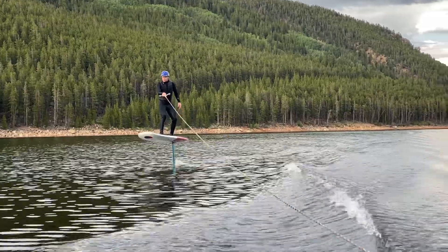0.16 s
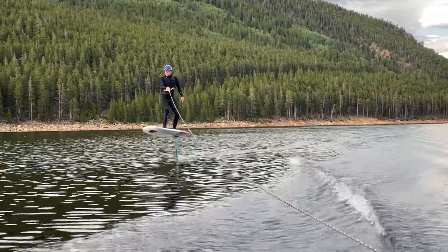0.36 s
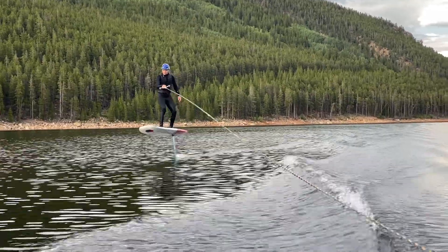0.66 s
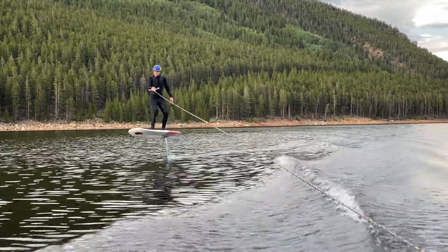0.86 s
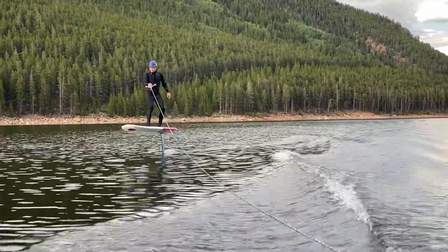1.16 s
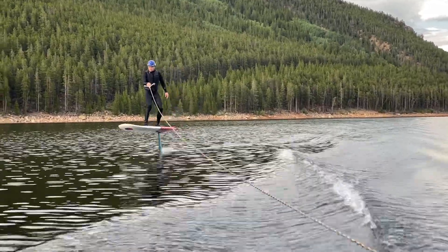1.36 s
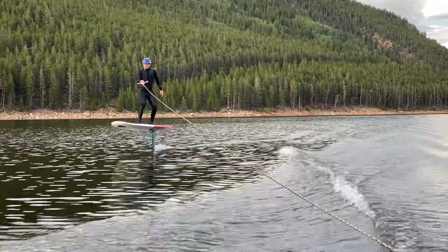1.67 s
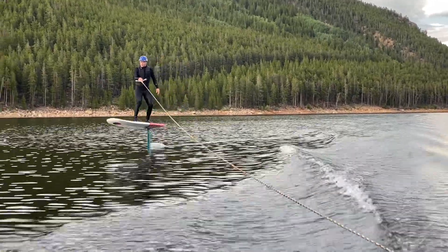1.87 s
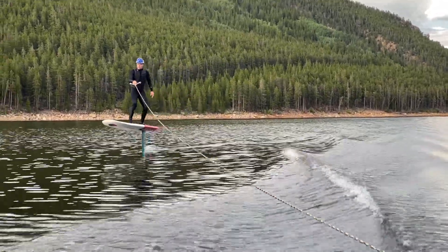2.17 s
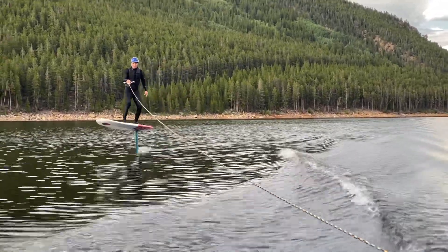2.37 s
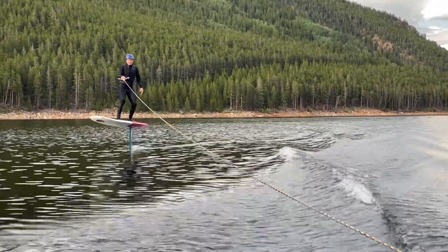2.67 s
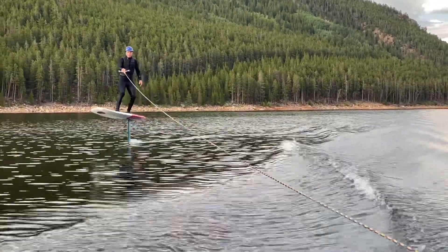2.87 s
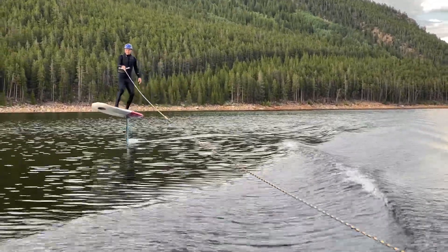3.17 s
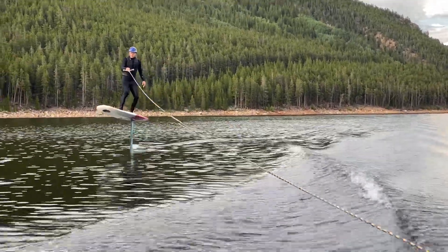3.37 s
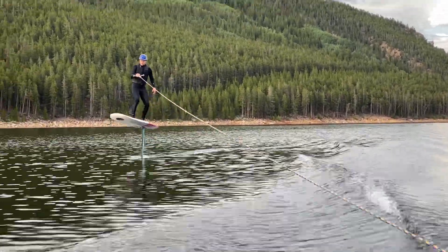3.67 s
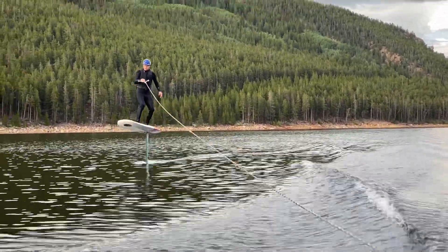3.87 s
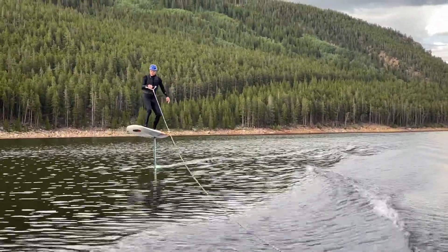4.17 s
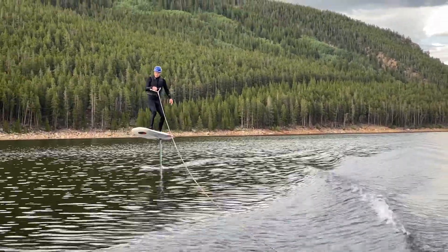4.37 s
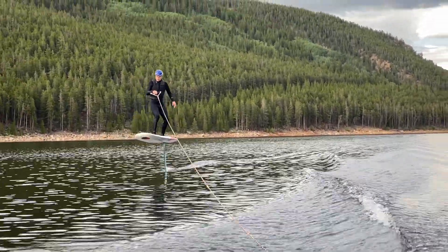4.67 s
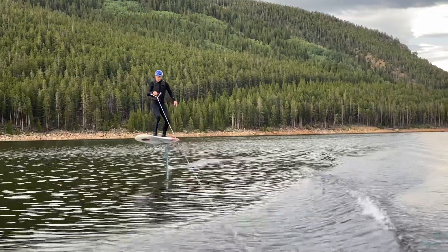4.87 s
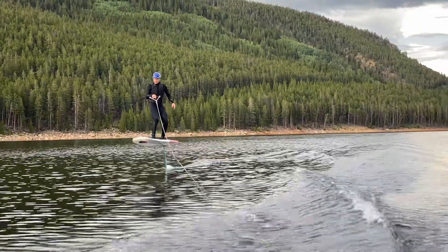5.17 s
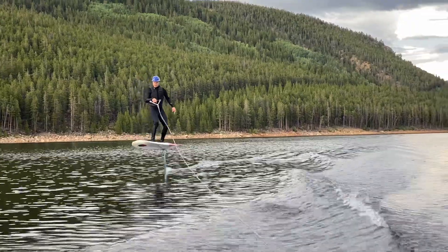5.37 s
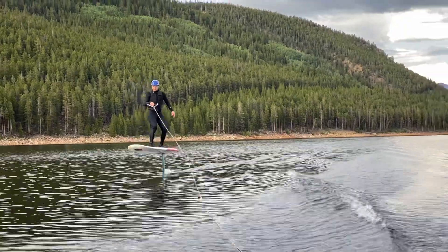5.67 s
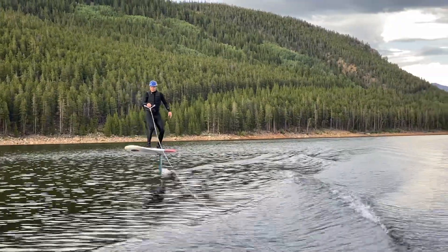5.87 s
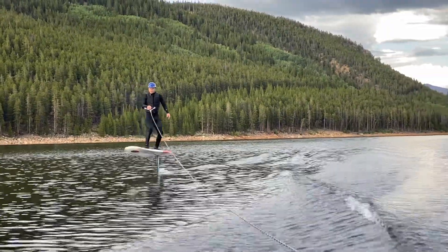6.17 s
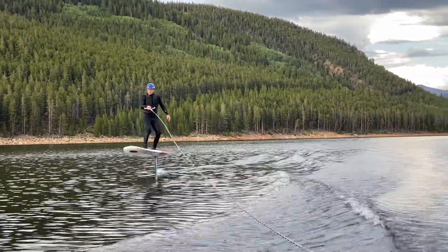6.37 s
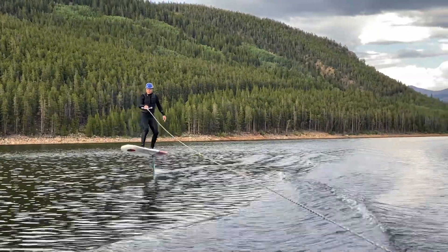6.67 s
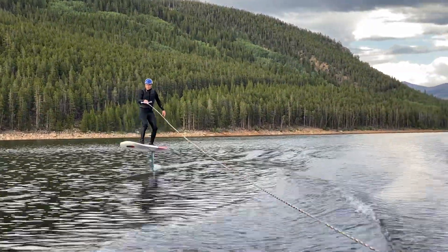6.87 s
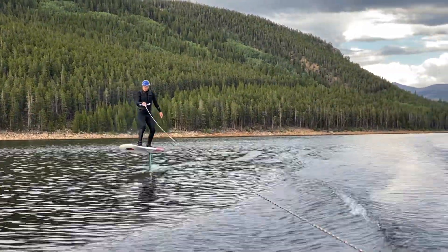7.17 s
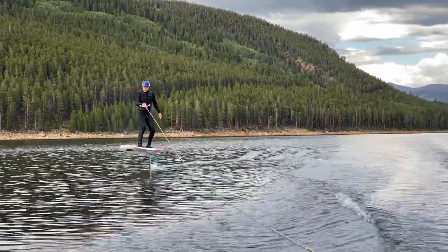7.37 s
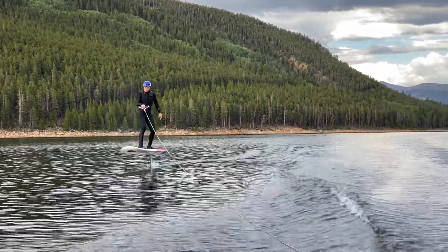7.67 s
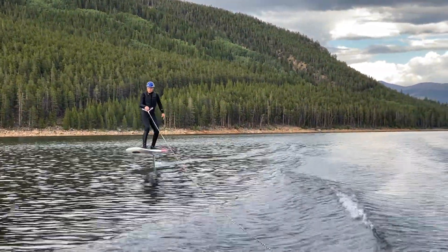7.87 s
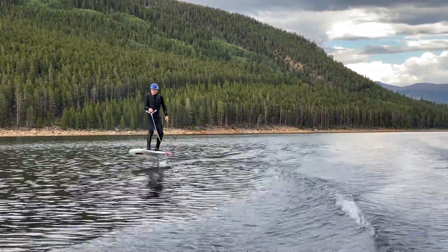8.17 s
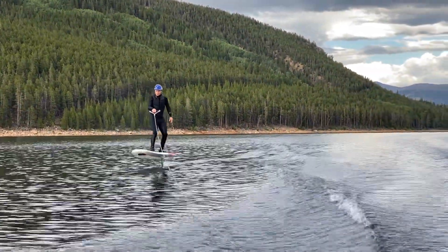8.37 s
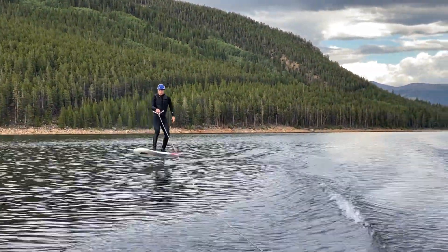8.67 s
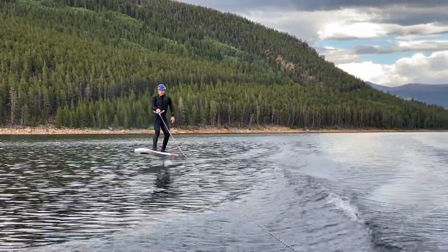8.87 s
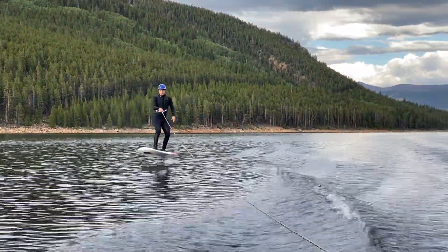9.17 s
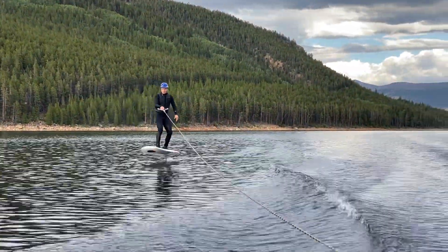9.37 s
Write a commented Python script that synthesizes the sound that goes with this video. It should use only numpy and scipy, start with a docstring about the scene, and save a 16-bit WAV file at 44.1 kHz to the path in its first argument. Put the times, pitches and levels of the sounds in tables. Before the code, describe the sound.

On board a tow boat, a constant low engine buzz and rough roar run over hissing spray, with irregular wind thumps throughout.

```python
"""On board a tow boat on a lake, the engine holding a nearly steady speed: a buzz of tones at multiples of the
shaft speed sits over a roar, filtered noise that throbs with the crank. The hiss of wake spray and engine
clatter is flickering treble noise. Head wind on a handheld microphone pair adds gusts of low noise, and each
pop is a short swing of pressure."""
import sys
import numpy as np
from scipy import signal
from scipy.fft import rfft, irfft, next_fast_len
from scipy.io import wavfile
from scipy.ndimage import uniform_filter1d, map_coordinates

SR = 44100
rng = np.random.default_rng(int(sys.argv[2]) if len(sys.argv) > 2 else 0)


def master(y):
    """Save y as 16-bit WAV."""
    cut = np.clip(np.atleast_2d(y).T, -1, 1)
    pcm = np.round(cut * 32767)  # scale
    wavfile.write(sys.argv[1], SR, pcm.astype(np.int16))


N = 420273

# stereo width of the noise, nearly mono in some bands and wide in others:
# freq_hz [Hz], side_db [dB, side noise against mid noise]
STEREO_WIDTH = [(300, -11), (560, -11), (680, -2.5), (1000, -5.5), (1300, -8), (1800, -19), (2150, -46),
                (2450, -35), (3100, -6.5), (3700, -27), (4400, -51), (6200, -46), (6500, -64), (7700, -63),
                (7950, -5), (10250, -16), (10450, -48), (11650, -50), (11900, -6), (14300, -16),
                (15100, -40)]


def amp(db):
    """Gain of a level in dB."""
    return 10 ** (np.asarray(db) / 20)


def unit(x):
    """Scale x to rms 1."""
    return x / np.sqrt(np.mean(x ** 2) + 1e-20)


def along(points, hz):
    """Read a (freq_hz, value) curve at hz, straight lines on a log frequency axis."""
    freq_hz, value = np.transpose(points)
    return np.interp(np.log(hz + 1), np.log(freq_hz + 1), value)


def resonance(hz, centre_hz, width_hz):
    """Power response of one ringing part, 1 at its centre."""
    return 1 / (1 + (2 * (hz - centre_hz) / width_hz) ** 2)


def wobble(rate):
    """A smooth random curve through normal random knots, rate knots a second."""
    knots = rng.standard_normal(int(N * rate / SR) + 4)
    return map_coordinates(knots, [np.arange(N) * rate / SR])


def filtered(x, response):
    """Multiply the spectrum of x by a response of frequency, real or complex."""
    size = next_fast_len(N + SR // 2)
    hz = np.fft.rfftfreq(size, 1 / SR)
    return irfft(rfft(x, size) * response(hz), size)[..., :N]


def rush(gain, width, envelope, patchy_db):
    """Stereo noise of rms 1: random patches of level, then a fast envelope, then colour and width."""
    spectrum = signal.stft(rng.standard_normal((2, N)), nperseg=512)[2]
    # smoothing over frequency, then time, turns single random cells into patches
    patches = rng.standard_normal(spectrum.shape[1:])
    patches = uniform_filter1d(patches, size=10, axis=0)
    patches = unit(uniform_filter1d(patches, size=3, axis=1))
    noise = signal.istft(spectrum * amp(patchy_db * patches), nperseg=512)[1][:, :N]

    def colour_and_width(hz):
        turn = np.arctan(amp(along(width, hz)))  # splits the power between mid and side
        return gain(hz) * np.array([np.cos(turn), np.sin(turn)])

    mid, side = filtered(envelope * noise, colour_and_width)
    return unit(np.array([mid + side, mid - side]))


def wind(steady_rumble_db=-29, steady_flutter_db=-31):
    """A steady stream over the ports with puffs on top, each band lumpy from its own fast envelope."""
    # puffs: centre_s [s], rumble_db [dB], flutter_db [dB], length_s [s]
    gusts = [(0.013, -18, -32, 0.051), (0.92, -23.3, -24, 0.13), (1.21, -22, -27, 0.05),
             (1.83, -24, -23, 0.049), (2.182, -20, -21, 0.095), (2.344, -20.7, -25.4, 0.07),
             (2.92, -22, -25, 0.14), (3.523, -27, -25, 0.05), (3.883, -21, -23, 0.13),
             (4.17, -22, -28, 0.11), (4.365, -19, -28, 0.099), (4.94, -18, -22, 0.078),
             (5.078, -20, -27, 0.055), (5.416, -21, -31, 0.18), (5.65, -21.2, -31, 0.083),
             (5.78, -20, -28, 0.046), (5.953, -23, -27, 0.074), (6.44, -19, -28, 0.056),
             (6.533, -20, -28, 0.05), (6.788, -26, -23.0, 0.12), (7.135, -20, -19.5, 0.044),
             (7.218, -18, -21.5, 0.04), (7.82, -30, -23, 0.07), (8.028, -20, -20.5, 0.067),
             (8.348, -18.5, -23.5, 0.11), (8.71, -19, -25, 0.088), (8.85, -20, -26, 0.03),
             (8.94, -18.5, -18, 0.04), (9.35, -22, -30, 0.03), (9.43, -25, -23, 0.05),
             (9.52, -20, -16.5, 0.03)]
    # colour of the deep rumble: freq_hz [Hz], relative_db [dB per Hz]
    rumble_colour = [(15, -46), (25, -18), (42, -9), (60, 3.5), (90, 1.5), (140, -3.5), (220, -12),
                     (400, -54), (900, -120)]
    # colour of the higher flutter: freq_hz [Hz], relative_db [dB per Hz]
    flutter_colour = [(80, -46), (140, -0.5), (240, 2.5), (330, -2.5), (500, -15.5), (800, -15),
                      (1500, -38), (3000, -120)]
    t = np.arange(N) / SR
    rumble_power = np.full(N, amp(2 * steady_rumble_db))
    flutter_power = np.full(N, amp(2 * steady_flutter_db))
    for centre_s, rumble_db, flutter_db, length_s in gusts:
        puff = np.exp(-2.5 * ((t - centre_s) / length_s) ** 2)
        rumble_power += amp(2 * rumble_db) * puff
        flutter_power += amp(2 * flutter_db) * puff
    rumble = rush(lambda hz: amp(along(rumble_colour, hz)), [(60, -8.0)], amp(1.3 * wobble(20)), patchy_db=-0.5)
    flutter = rush(lambda hz: amp(along(flutter_colour, hz)), [(200, -9.0)], amp(1.6 * wobble(35)), patchy_db=0.5)
    # both bands lean to the right port, the flutter more
    rumble *= np.sqrt(rumble_power) * amp([[-.4], [.4]])
    flutter *= np.sqrt(flutter_power) * amp([[-1.1], [1.1]])
    return rumble + flutter


def pops():
    """An eddy strikes the ports: one push and pull of pressure, a little different at each port."""
    # pops: centre_s [s], level_db [dB, top of the bell envelope before the spread between ports]
    strikes = [(1.229, -10.9), (2.158, -15), (2.938, -7), (3.888, -8), (4.366, -16), (4.886, -6),
               (4.917, -11), (5.08, -12), (6.429, -14), (6.517, -3), (6.588, -3), (6.731, -19),
               (7.126, -10), (7.831, -11), (8.28, -7), (8.345, -12), (8.369, -10), (8.914, -4), (8.955, -8),
               (9.435, -7), (9.519, -15)]
    pitch_hz, pitch_scatter = 260, 0.065  # middle pitch, and its random spread as a share
    out = np.zeros((2, N + SR))
    t = np.arange(-512, 512) / SR
    port = np.array([[1], [-1]])  # left, right
    draws = rng.standard_normal((len(strikes), 4))
    for (centre_s, level_db), (turn, pan, skew, size) in zip(strikes, draws):
        hz = pitch_hz * np.exp(pitch_scatter * size)
        bell = np.exp(-(3.3 * hz * t) ** 2)
        swing = bell * np.sin(2 * np.pi * hz * t + .4 * turn + 0.27 * skew * port)
        first = round(centre_s * SR)
        out[:, first:first + len(t)] += amp(level_db + 1.1 * pan * port) * swing
    half = len(t) // 2  # puts the middle of each swing on its time
    return out[:, half:half + N]


def crank():
    """Crank angle in radians, the running sum of the shaft speed."""
    # shaft speed: time_s [s], speed_hz [turns per second]
    shaft_speed = [(0.0, 70.88), (2.0, 70.61), (2.8, 70.75), (4.0, 70.57), (5.2, 70.63), (6.2, 70.87),
                   (6.8, 70.87), (7.2, 70.75), (8.0, 70.7), (9.6, 70.75)]
    time_s, speed_hz = np.transpose(shaft_speed)
    return 2 * np.pi * np.cumsum(np.interp(np.arange(N) / SR, time_s, speed_hz)) / SR


def hiss(angle):
    """Wake spray and engine clatter: flickering treble noise that also pulses once and twice a turn."""
    # colour of the treble: freq_hz [Hz], relative_db [dB per Hz]
    treble_colour = [(1710, -10.5), (2900, -4.5), (3180, -13.5), (3390, -8.5), (4150, -1), (4520, -5),
                     (5360, -4.5), (6410, -9), (7140, -14), (8530, -8), (10500, -8.5), (12100, -13.5),
                     (13400, -12), (14400, -21), (16000, -20.5)]
    # metal parts ringing in the clatter: centre_hz [Hz], width_hz [Hz], boost_db [dB above the hiss]
    rattles = [(4270, 74, 3), (5250, 470, 1.5), (5800, 150, 1), (6300, 220, 4)]
    level_db = -35  # middle level

    def gain(hz):
        ringing_db = sum(boost_db * resonance(hz, centre_hz, width_hz) for centre_hz, width_hz, boost_db in rattles)
        return amp(along(treble_colour, hz) + ringing_db)

    turn_db = 1.0 * np.cos(angle + 2.2) + .6 * np.cos(2 * angle)
    pulse = amp(turn_db + 0.47 * wobble(45))
    level = amp(level_db + 0.21 * wobble(20))
    return level * rush(gain, STEREO_WIDTH, pulse, patchy_db=0.9)


def roar(angle):
    """Exhaust and intake noise, pushed by the firings, rings in the exhaust and engine cover."""
    # resonances of exhaust and cover: centre_hz [Hz], width_hz [Hz], peak_db [dB], all before sharpening
    cover_modes = [(568, 134, -0.5), (788, 226, 0), (990, 74, -3), (1216, 140, -2), (1415, 185, -2),
                   (1589, 114, -1.5), (1860, 280, -6), (2435, 330, -4.5)]
    # smooth roar under them: freq_hz [Hz], relative_db [dB per Hz, before the low cut]
    smooth_roar = [(100, -33), (250, -12), (400, -5), (1000, -22), (2000, -10.5), (2900, -14), (3600, -34),
                   (6000, -120)]
    # balance of the ports: freq_hz [Hz], left_minus_right_db [dB]
    port_tilt = [(400, 3), (600, -1), (780, -9.5), (1000, -6), (1200, -3), (1350, 0)]
    level_db = -26  # middle level, before the port balance

    def gain(hz):
        ringing = sum(amp(2 * peak_db) * resonance(hz, centre_hz, width_hz)
                      for centre_hz, width_hz, peak_db in cover_modes)
        power = amp(2 * along(smooth_roar, hz)) + ringing ** 1.5  # the exponent sharpens the peaks
        low_cut = 1 + (250 / (hz + 1)) ** 4
        return np.sqrt(power) / low_cut

    # the throb is strongest four times a turn, weaker at twice and once
    throb_db = 0.27 * np.cos(angle) + 0.48 * np.cos(2 * angle) + 1.8 * np.cos(4 * angle)
    level = amp(level_db + 0.35 * wobble(9.2))
    sound = level * rush(gain, STEREO_WIDTH, amp(throb_db), patchy_db=1.0)
    # the hand and housing shade the left port in the middle range
    return filtered(sound, lambda hz: amp(np.outer([.5, -.5], along(port_tilt, hz))))


def buzz(angle):
    """Each shaft order is a tone of nearly steady level, the high ones wavering more."""
    # engine tones: order [multiple of shaft speed], left_db [dB rms], right_db [dB rms], before wavering
    order_levels = [(1, -29.5, -28.0), (2, -21.4, -18.8), (3, -30.2, -23.3), (4, -20.2, -16.7),
                    (5, -39.7, -39.0), (6, -56.7, -44.0), (7, -44.7, -45.0), (8, -38.0, -35.2),
                    (9, -38.6, -29.6), (10, -44.2, -31.3), (11, -48.0, -36.7), (12, -47.4, -34.4),
                    (13, -40.1, -43.8), (14, -47.7, -35.9), (15, -53.7, -49.2), (16, -47.9, -51.7),
                    (17, -46.2, -37.3), (18, -38.5, -40.5), (19, -44.8, -45.5), (20, -50.3, -46.0),
                    (21, -48.1, -50.9), (22, -42.2, -42.0), (23, -45.1, -44.5), (25, -45.9, -45.9),
                    (27, -42.2, -41.8), (28, -44.9, -44.8), (29, -54, -54), (30, -52.3, -52.3),
                    (36, -53.3, -53.1), (37, -56, -56), (39, -56, -56), (40, -55.5, -55.5), (41, -59, -59),
                    (43, -61, -61), (45, -62, -62), (46, -63, -63), (53, -61, -61), (60, -60.1, -60.0)]
    out = np.zeros((2, N))
    for order, left_db, right_db in order_levels:
        loose = min(order / 12, 1)
        # the exhaust pipe spreads each pulse in time: phase grows with the square of the order;
        # odd orders, born of the difference between the two firings of a turn, lie apart from the even
        spread = .3 * order * order + 1.05 * (order % 2) - .75
        level = np.sqrt(2) * amp((.3 + .7 * loose) * wobble(3))
        tone = level * np.cos(order * angle + spread + .1 * loose * wobble(4))
        # a four-stroke repeats every second turn: faint tones half an order either side, fainter low down
        tone *= 1 + 0.14 * loose ** 2 * np.cos(angle / 2 + spread)
        out += amp([[left_db], [right_db]]) * tone
    return out


def scene():
    """Engine, wake and wind, all engine-driven layers sharing one crank."""
    angle = crank()
    return buzz(angle) + roar(angle) + hiss(angle) + wind() + pops()


def record(dry):
    """Left and right are offset in phase by frequency, the highest peaks rounded off, the top cut away."""
    # stereo phase offset, smooth low down, in bands of offset and no offset in the treble:
    # freq_hz [Hz], left_lead_rad [radians]
    phase_offset = [(60, -.12), (300, -.22), (500, -.8), (700, -1.9), (800, -.3), (1000, -1.7), (1200, -.3),
                    (1280, -1.2), (1900, -.06), (2100, 0), (7750, 0), (7950, 1.7), (8700, 2.1), (10250, .9),
                    (10450, 0), (11650, 0), (11900, -1.5), (13000, -3), (13900, -3.2), (14900, -6.28)]
    ceiling, top_hz = .92, 15900  # rounding level as a share of full scale, band limit in Hz
    stereo = filtered(dry, lambda hz: np.exp(1j * np.outer([.5, -.5], along(phase_offset, hz))))
    rounded = stereo / (1 + np.abs(stereo / ceiling) ** 8) ** (1 / 8)
    return filtered(rounded, lambda hz: hz < top_hz)


dry = scene()
out = record(dry)
master(out)
```